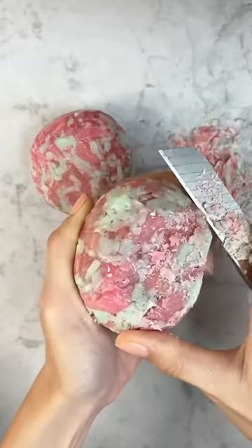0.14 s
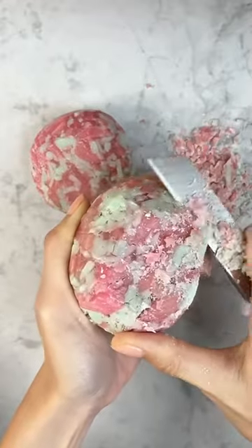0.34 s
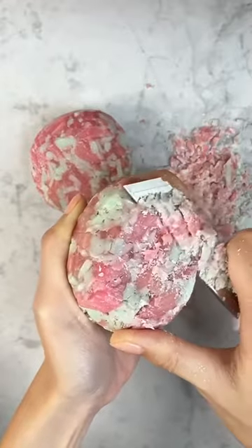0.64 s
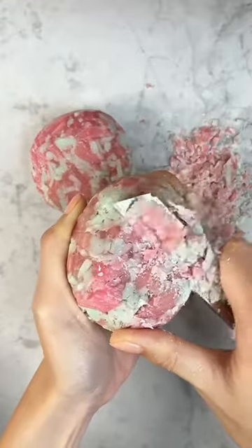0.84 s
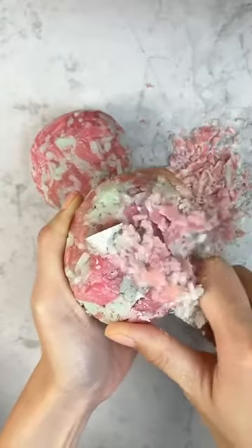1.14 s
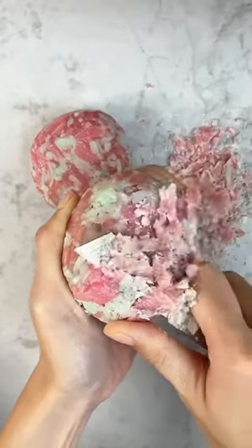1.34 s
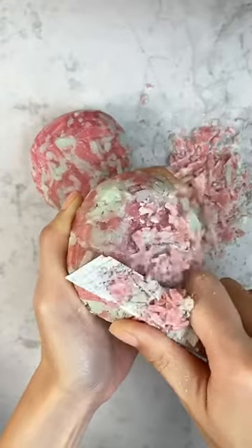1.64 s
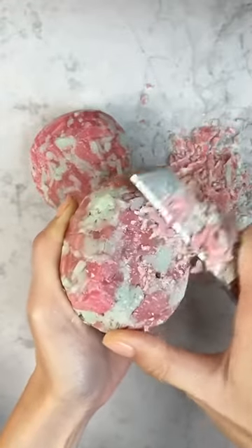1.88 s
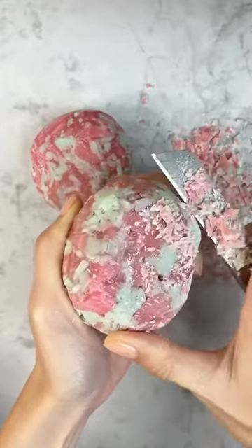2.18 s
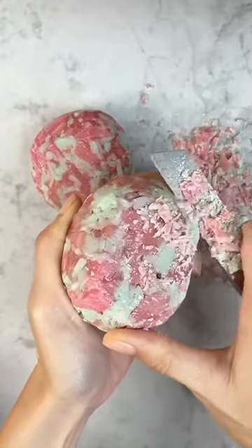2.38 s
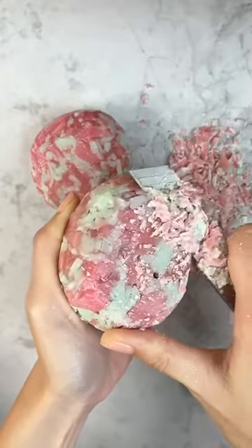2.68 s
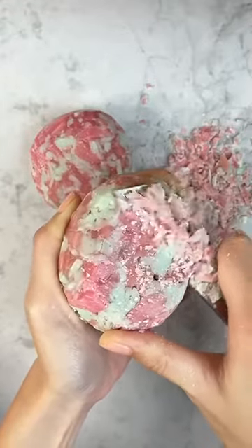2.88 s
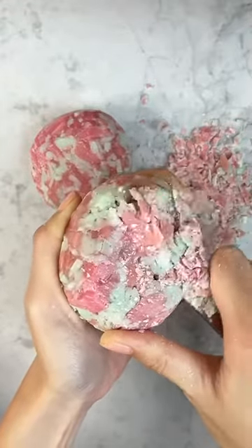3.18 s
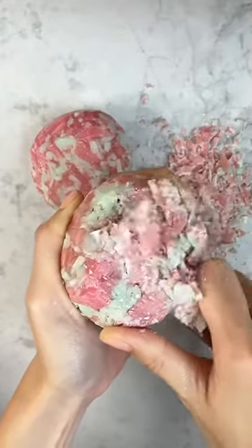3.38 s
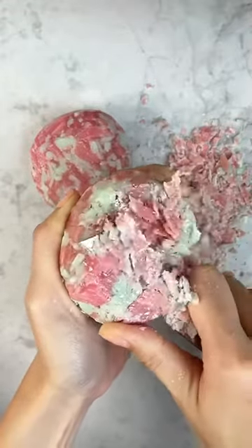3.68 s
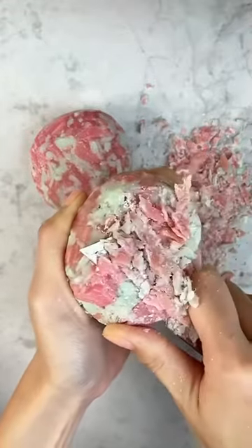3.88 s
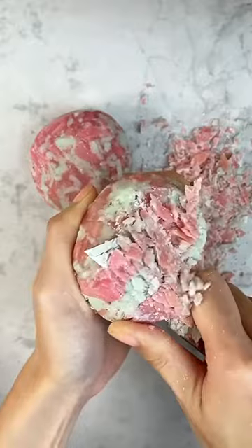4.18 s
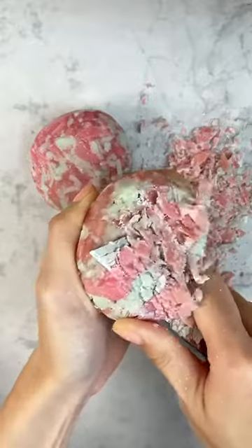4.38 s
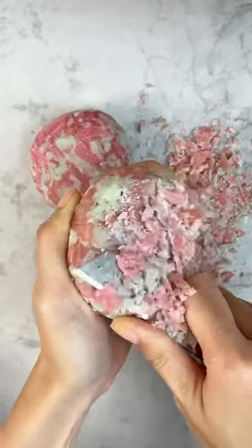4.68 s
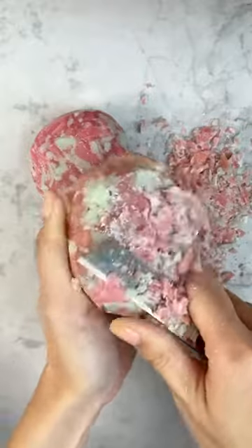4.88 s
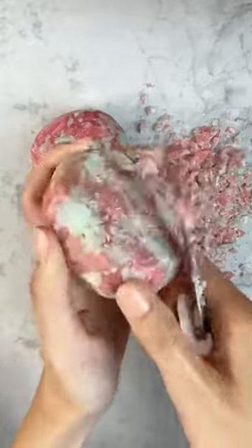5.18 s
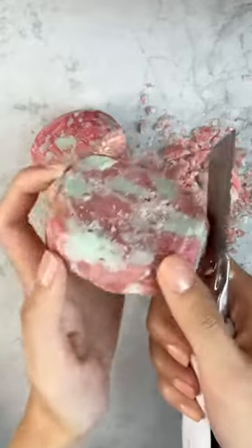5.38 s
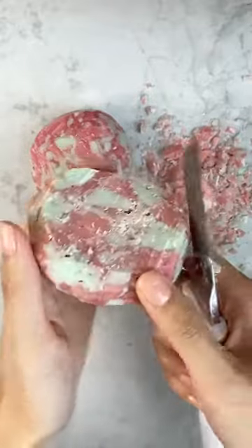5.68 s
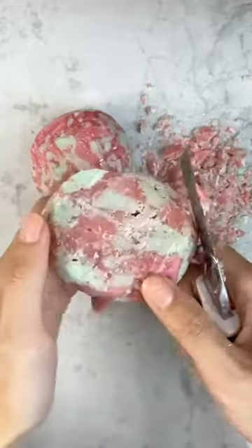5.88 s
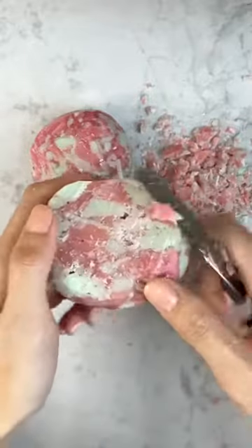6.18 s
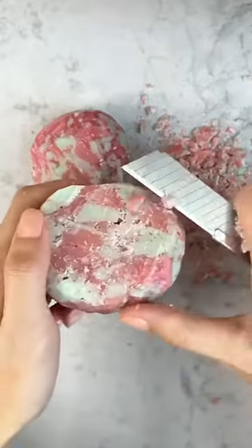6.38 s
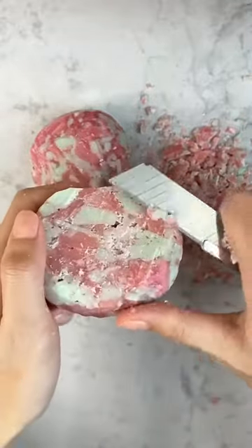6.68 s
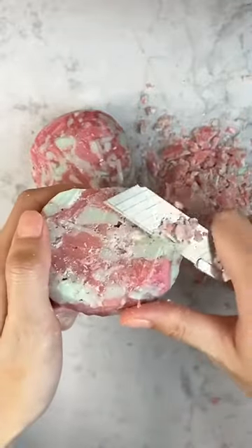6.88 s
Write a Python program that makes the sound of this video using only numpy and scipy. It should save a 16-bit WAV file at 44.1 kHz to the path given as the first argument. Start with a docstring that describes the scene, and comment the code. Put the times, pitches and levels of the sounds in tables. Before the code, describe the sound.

Close to the microphone, dry pressed soap crunches and fizzes under a knife blade in uneven scraping strokes, dotted with tiny cracks, metallic ticks and soft, low knocks. Fingers rustle faintly on the powdery surface in the pauses. After a longer lull the blade clinks and the crumbling starts again. A low rumble and faint hiss fill the small room.

```python
"""A snap-off blade pushed through a hand-held ball of dry pressed soap, close to the microphone.
The edge crumbles the soap in a stream of tiny fractures; flakes crack off, the blade pings, and when
it sticks and slips the ball knocks dully. The hands take the jolts with soft thumps and rustle on
the powder between strokes. The place is a small room with a low rumble and a faint hiss; the stone
top under the hands and the walls answer briefly."""
import sys
import numpy as np
from scipy import signal
from scipy.fft import rfft, irfft
from scipy.io import wavfile

SR = 44100
rng = np.random.default_rng(int(sys.argv[2]) if len(sys.argv) > 2 else 0)


def unload_audio(sound):
    """Save the sound as a 16-bit wav file, at the path given as the first command line argument."""
    columns = np.transpose(np.atleast_2d(sound))
    # keep every value between -1 and 1, then stretch to whole-number steps
    steps = np.round(np.clip(columns, -1, 1) * 32767)
    wavfile.write(sys.argv[1], SR, steps.astype(np.int16))


N = 310464
TIME = np.arange(N) / SR
LOW_HZ, CRUNCH_HZ, FIZZ_HZ, TOP_HZ, CUTOFF_HZ = 247, 1397, 6030, 14600, 16000   # band edges

# low resonances of the ball and the small room, ringing with each knock: pitch_hz, width_hz, gain_db
LOW_RESONANCES = [(111, 34, -11.5), (221.4, 37, -4.5), (237, 21, -3.5), (333.8, 38.4, 0.5), (432, 64, 0),
                  (536.5, 83, -4.5), (835, 32, -11), (1038, 55, -7), (1357, 150, -20), (1700, 410, -25)]


def from_db(db):
    """Decibels to gain."""
    return 10 ** (np.asarray(db) / 20)


def unit_power(x):
    """Scale to a mean square of 1."""
    return x / np.sqrt(np.mean(x ** 2) + 1e-20)


def as_blow(x):
    """Scale to the energy of 8 ms at unit power."""
    return x * np.sqrt(.008 * SR / np.sum(x ** 2))


def drift(rate_hz):
    """A smooth random wander of spread 1."""
    pole = np.exp(-20 * np.pi * rate_hz / SR)
    slow = signal.lfilter([1], [1, -2 * pole, pole * pole], rng.standard_normal(N // 10 + 4002))[4000:]
    return np.interp(np.arange(N) / 10, np.arange(len(slow)), unit_power(slow))


def butter(x, hz, kind, order=2):
    """Causal Butterworth filter."""
    sections = signal.butter(order, np.clip(hz, 10, .45 * SR), kind, fs=SR, output="sos")
    return signal.sosfilt(sections, x + 1e-18)


def resonance(x, hz, width_hz):
    """One damped mode, gain 1 at its peak."""
    r = np.exp(-np.pi * width_hz / SR)
    feedback = [1, -2 * r * np.cos(2 * np.pi * hz / SR), r * r]
    return signal.lfilter(np.array([1, 0, -1]) * (1 - r * r) / 2, feedback, x + 1e-18)


def coloured(x, peaks):
    """A chain of peaks and dips."""
    for hz, width_hz, lift_db in peaks:
        x = x + (from_db(lift_db) - 1) * resonance(x, hz, width_hz)
    return x


def shaped(x, spectrum):
    """Filter by a curve of (frequency_hz, gain_db) points; unit power."""
    hz, db = np.transpose(spectrum)
    curve_db = np.interp(np.log(np.fft.rfftfreq(N, 1 / SR) + 1e-9), np.log(hz), db)
    return unit_power(irfft(rfft(x) * from_db(curve_db), N))


def fractures(per_s, spread_db, size=N):
    """Clicks at random moments, their levels scattered by spread_db; unit power."""
    chance, energy = rng.uniform(-1, 1, size), rng.exponential(1, size)
    clicks, at = np.zeros(size), np.abs(chance) < per_s / SR
    clicks[at] = np.sign(chance[at]) * from_db(spread_db * np.minimum(energy[at], 4))
    return unit_power(clicks)


def gesture(start_s, length_s, attack_s, release_s):
    """The power of one movement: it builds up, holds and dies away."""
    age = TIME - start_s
    return (np.clip(age / attack_s, 0, 1) * np.exp(-np.clip((age - length_s) / release_s, 0, 20))) ** 2


def room_tone(rumble_db=-33, hiss_db=-60.5):
    """The steady background of the place: a low rumble and a faint hiss."""
    # spectra of the two noises: frequency_hz, relative_db
    rumble_spectrum = [(8, 1.5), (14, -7.5), (24, -6.5), (32, -21), (40, -16.5), (48, -13), (62, -23.5),
                       (85, -25), (120, -36.5), (200, -38), (300, -47.5), (600, -66.5)]
    hiss_spectrum = [(100, 10.5), (220, 2.5), (350, -3.5), (650, -8.5), (1000, -10), (2100, -14.5),
                     (5000, -22.5), (12000, -40), (16000, -45)]
    rumble = shaped(rng.standard_normal(N), rumble_spectrum)
    hiss = shaped(rng.standard_normal(N), hiss_spectrum)
    return from_db(rumble_db) * rumble + from_db(hiss_db) * hiss


def reflections(x, stone_s=.0122, stone_db=-10, nearby_db=-22, spread_s=.03, dull_hz=2600):
    """One clear echo from the stone top and eight weaker ones from things nearby, all dulled."""
    out = from_db(stone_db) * np.interp(TIME - stone_s, TIME, x, left=0)
    for lag_s in rng.uniform(.1, 1, 8) * spread_s:
        lag = int(lag_s * SR)
        out[lag:] += rng.choice([-1, 1]) * from_db(nearby_db) * x[:-lag]
    return butter(out, dull_hz, "low", order=1)


def room(x, scatter_db=-17.5, scatter_t60_s=.077, walls_db=-28, walls_t60_s=.52, dull_hz=10000):
    """After the first reflections each band lingers as diffuse scatter and a faint tail from the walls."""
    out = x + reflections(x)
    age, linger = np.arange(16000) / SR, 0
    onset = np.clip(age / .003 - .5, 0, 1)
    for db, t60_s in [(scatter_db, scatter_t60_s), (walls_db, walls_t60_s)]:
        decay = (from_db(-60 * age / t60_s) * onset) ** 2
        linger += from_db(db) ** 2 * decay / decay.sum()
    edges = np.geomspace(180, CUTOFF_HZ, 8)
    for band in zip(edges, edges[1:]):
        energy = np.abs(signal.oaconvolve(butter(x, band, "band") ** 2, linger)[:N])
        noise = unit_power(butter(rng.standard_normal(N), band, "band"))
        out += np.sqrt(energy / (1 + (band[0] / dull_hz) ** 2)) * noise
    return out


def low_ring(force, stretch=1, touch_db=np.zeros(len(LOW_RESONANCES))):
    """Low resonances of the ball and the small room; stretch scales pitches, touch_db weights them."""
    return sum((-1) ** k * from_db(db + touch_db[k]) * resonance(force, hz * stretch, width_hz)
               for k, (hz, width_hz, db) in enumerate(LOW_RESONANCES))


def hand_thumps(pitch_hz=165, width_hz=90, soft_hz=210, settle_s=.011, size=4000):
    """Flesh gives under the ball: a short, heavily damped low thud."""
    # the hands take a jolt of the blade: start_s, level_db
    jolts = [(0.306, -48.5), (0.369, -47), (1.09, -44), (2.404, -46), (2.453, -43.5), (3.329, -45.5),
             (3.733, -37.5), (4.51, -45), (4.927, -36.5), (5.058, -46.5), (6.635, -40.5), (6.76, -49),
             (6.889, -41.5)]
    out, age = np.zeros(N + size), np.arange(size) / SR
    for start_s, db in jolts:
        force = butter(rng.standard_normal(size) * np.exp(-age / settle_s), soft_hz, "low")
        out[int(start_s * SR):][:size] += from_db(db) * as_blow(resonance(force, pitch_hz, width_hz))
    return out[:N]


def finger_rubs(uneven_db=6):
    """Fingertips drag powder over the ball: a fine, uneven rustle and a low murmur."""
    # the fingers shift between strokes: start_s, length_s, rustle_db, murmur_db
    shifts = [(0.0, 0.066, -62, -58.5), (0.151, 0.2, -61.5, -85), (4.004, 0.024, -61.5, -69),
              (4.272, 0.26, -67.5, -68), (5.395, 0.337, -63.5, -71), (5.674, 0.056, -62.5, -70),
              (5.814, 0.28, -68, -69), (6.018, 0.094, -69, -72), (6.182, 0.13, -64, -65),
              (6.55, 0.052, -63, -55)]
    # powder under the fingertips: frequency_hz, relative_db
    powder_spectrum = [(300, -1), (1200, 0), (2200, 5.5), (4000, 1), (8000, 0), (11000, 4.5), (14000, -2.5),
                       (16000, -5.5)]
    grit = fractures(per_s=3000, spread_db=.5) * from_db(uneven_db * drift(rate_hz=25))
    rustle, murmur = shaped(grit, powder_spectrum), unit_power(low_ring(grit))
    out = np.zeros(N)
    for start_s, length_s, rustle_db, murmur_db in shifts:
        envelope = np.sqrt(gesture(start_s, length_s, attack_s=.014, release_s=.038))
        out += envelope * (from_db(rustle_db) * rustle + from_db(murmur_db) * murmur)
    return out


def blade_pings(width_hz=290, spread_hz=1200, contact_s=.0035, grit_db=-20, size=1500):
    """A brief gritty contact rings one bending mode of the blade; the soap damps it quickly."""
    # the blade is tapped or springs free, pitched by where it is held: start_s, pitch_hz, level_db
    taps = [(0.226, 1960, -51), (0.3759, 1950, -57), (0.4643, 2040, -47), (0.935, 2450, -40.5),
            (1.5142, 1780, -42), (1.9246, 3260, -37.5), (1.9428, 4400, -38), (1.9587, 1840, -37.5),
            (2.352, 1980, -39.5), (2.404, 1970, -46), (2.4562, 2030, -49.5), (2.7416, 2500, -44.5),
            (3.686, 1100, -41.5), (4.6038, 3270, -38), (5.0648, 4520, -36), (6.117, 2000, -57),
            (6.16, 760, -29), (6.162, 2050, -31), (6.1619, 2920, -35.5), (6.4982, 1970, -51.5),
            (6.7258, 4280, -25.5), (6.727, 2980, -28.5)]
    out, age = np.zeros(N + size), np.arange(size) / SR
    for start_s, hz, db in taps:
        force = from_db(grit_db) * rng.standard_normal(size) * np.exp(-age / contact_s)
        force[0] += 1
        ping = resonance(resonance(force, hz, spread_hz), hz, width_hz)
        out[int(start_s * SR):][:size] += from_db(db) * as_blow(ping)
    return out[:N]


def blade_slips(soft_hz=1300, hardening=.74, typical_db=-35, settle_db=-29, settle_s=.0036, size=3000):
    """Each slip is one soft blow on the ball, followed by a short shudder as the edge bites again."""
    # the blade jumps forward or knocks into the ball: start_s, level_db
    jumps = [(0.628, -38.5), (0.6974, -32), (0.7732, -31), (0.8485, -36.5), (0.8781, -34), (1.047, -35),
             (1.0723, -38.5), (1.1015, -30.5), (1.1596, -36), (1.2789, -35.5), (1.3402, -32),
             (1.4619, -27.5), (1.5201, -39.5), (1.678, -41.5), (1.9032, -37.5), (1.9732, -35.5),
             (2.0173, -36), (2.618, -46), (3.0066, -39), (3.112, -38.5), (3.1724, -38), (3.1844, -28),
             (3.5216, -30), (3.7403, -41), (4.474, -41), (4.5127, -38), (4.5675, -39.5), (4.5927, -35.5),
             (4.7996, -38), (4.9176, -39.5), (4.9747, -37.5), (5.932, -48), (5.968, -47.5), (6.16, -44),
             (6.6338, -42.5), (6.738, -41)]
    out, age = np.zeros(N + size), np.arange(size) / SR
    for start_s, db in jumps:
        force = from_db(settle_db) * fractures(1000, 2.5, size) * np.exp(-age / settle_s)
        force[0] += 1
        contact_hz = soft_hz * from_db(hardening * (db - typical_db))   # harder blows are brighter
        stretch = 1 + .024 * rng.standard_normal()
        touch_db = 3.5 * rng.standard_normal(len(LOW_RESONANCES))
        knock = low_ring(butter(force, contact_hz, "low"), stretch, touch_db)
        out[int(start_s * SR):][:size] += from_db(db) * as_blow(knock)
    return out[:N]


def flake_cracks(rise=.66, ring_db=3.5, ring_width_hz=350, trim_db=-3, size=2600):
    """A crack runs through a flake in milliseconds: a burst of fractures ringing at its pitches."""
    # flakes break and the blade strikes the soap: start_s, length_s, relative_db, tilt_db (per band)
    breaks = [(0.262, .004, -57, 10), (0.3764, 0.0054, -44, 1.5), (0.4617, 0.0097, -41.5, 1.5),
              (0.5644, 0.0031, -48.5, 6), (0.629, 0.0015, -57.5, 17.5), (0.906, 0.0039, -46.5, 11),
              (0.92, 0.0016, -51, 6), (0.9316, 0.0081, -44.5, 1.5), (0.9885, 0.0028, -46, 3),
              (1.218, 0.0042, -45, 0), (1.258, .002, -49, 9), (1.31, 0.0015, -43.5, -5),
              (1.5133, 0.0026, -39.5, 5), (1.5465, 0.0027, -46.5, 4), (1.6792, 0.0029, -51, -12.5),
              (1.874, 0.0028, -45.5, 1), (1.924, 0.0017, -39, -9.5), (1.9447, 0.0027, -26.5, 5.5),
              (2.403, 0.0049, -46.5, 0), (2.4566, .005, -46, 1), (2.743, 0.0047, -44, 2),
              (2.9314, 0.0029, -45.5, -2.5), (2.964, 0.0042, -39.5, 3), (3.0706, 0.0036, -39.5, -6),
              (3.082, 0.0032, -38, 0.5), (3.1595, .003, -49.5, -6), (3.2854, 0.0023, -41.5, 15.5),
              (3.336, 0.0028, -45, 6.5), (3.391, .003, -47.5, -1), (3.687, 0.0034, -51.5, -5),
              (3.726, .0026, -43.5, -4.5), (3.7578, 0.0027, -51, -0.5), (4.179, .0026, -67.5, -10),
              (4.318, 0.0053, -69, 9), (4.6024, 0.0026, -36, 1), (4.7604, 0.0016, -46.5, 0.5),
              (4.8074, 0.0027, -56.5, -22.5), (5.035, 0.0023, -40.5, 2.5), (5.0672, 0.0021, -34.5, 2.5),
              (5.125, 0.0024, -32, -1.5), (5.373, 0.0032, -52.5, -9), (5.6784, .002, -55, 0),
              (6.161, 0.0033, -35, 5.5), (6.2455, 0.0032, -56, -3.5), (6.4967, 0.0018, -61, -12.5),
              (6.6354, 0.0012, -46.5, -4.5), (6.7255, 0.0022, -29, 1.5), (6.958, 0.0043, -52.5, 11)]
    # the blade as a flake lets it go: pitch_hz, width_hz, lift_db
    free_blade = [(1400, 67, -2.5), (3160, 380, 6.5), (3800, 720, -2.5), (4380, 200, 4.5),
                  (5370, 3100, -0.5), (10100, 6000, 4.5)]
    out, lead = np.zeros(N + size), size // 4
    age = (np.arange(size) - lead) / SR
    edges = [LOW_HZ, CRUNCH_HZ, FIZZ_HZ, TOP_HZ]
    for start_s, length_s, db, tilt_db in breaks:
        past_crest = age / length_s - .5
        envelope = np.exp(np.minimum(past_crest / rise, -past_crest))
        burst = envelope * fractures(per_s=14000, spread_db=3, size=size)
        flake = [(hz, ring_width_hz, ring_db) for hz in rng.uniform(CRUNCH_HZ, TOP_HZ, size=4)]
        burst = coloured(burst, free_blade + flake)
        for k, band_db in enumerate([db - tilt_db, db, db + tilt_db]):
            part = as_blow(butter(burst, edges[k:k + 2], "band"))
            out[int(start_s * SR) - lead:][:size] += (-1) ** k * from_db(band_db + trim_db) * part
    return out[:N]


def crumbs(per_s=110, width_hz=700, ring_db=13, count=14):
    """Single grains pop off now and then, each with a pitch set by its size; unit power."""
    pitches = np.linspace(CRUNCH_HZ, TOP_HZ, count) * rng.uniform(.9, 1.1, count)
    return unit_power(sum(coloured(fractures(per_s / count, spread_db=2), [(hz, width_hz, ring_db)])
                          for hz in pitches))


def chips(decay_s=.0036):
    """Small flakes chip off at random, each a brief burst; unit power."""
    onsets = np.abs(fractures(per_s=14, spread_db=-1.5))
    envelope = signal.lfilter([1], [1, -np.exp(-1 / (decay_s * SR))], onsets + 1e-18)
    return unit_power(envelope * rng.standard_normal(N))


def flake_ring(x, width_hz=330, ring_db=-7, wander_db=7, count=13):
    """Curling flakes each ring at a pitch of their own, and come and go."""
    pitches = np.linspace(CRUNCH_HZ, TOP_HZ, count) * rng.uniform(.94, 1.06, count)
    return x + sum(resonance(x, hz, width_hz) * from_db(ring_db + wander_db * np.clip(drift(19), -2, 2))
                   for hz in pitches)


def ball_shudder(force, bump_db=1, broad_db=-9):
    """The ball trembles with the fractures and bumps each time the edge gives a little; unit power."""
    force = force + from_db(bump_db) * fractures(per_s=90, spread_db=2)
    broad = unit_power(butter(force, [LOW_HZ, CRUNCH_HZ], "band"))
    return unit_power(unit_power(low_ring(force)) + from_db(broad_db) * broad)


def effort(moves, attack_s, release_s):
    """Overlapping movements add in power: how hard the ball shakes, the soap crunches and fizzes."""
    power = np.zeros((3, N))
    for start_s, length_s, db, ball_db, fineness_db in moves:
        gains = from_db([ball_db, db - fineness_db, db + fineness_db])
        power += np.outer(gains ** 2, gesture(start_s, length_s, attack_s, release_s))
    return power


def crumbling(powder_db=-10, crumb_db=-2, chip_db=-3, judder_db=4, coarse_db=2, trim_db=-1):
    """Tiny fractures clump as the edge judders; they shake the ball and set the flakes ringing."""
    # the blade travels at a steady pressure: start_s, length_s, crumbling_db, ball_db, fineness_db
    strokes = [(0.419, 1.104, -58, -56.5, 3), (1.663, 0.45, -59.5, -53.5, 1),
               (2.408, 1.01, -61, -64.5, 1.5), (3.40, 0.44, -70.5, -56, 5.5), (4.485, 0.19, -59, -51.5, 2),
               (4.755, 0.59, -61.5, -54, 1), (6.635, 0.1, -60, -64, -2), (6.85, 0.21, -60.5, -59.5, 3)]
    # the edge bites deeper and a patch of soap gives way: same columns
    bites = [(0.302, 0.067, -51.5, -61, -3.5), (0.492, 0.023, -46, -71, 3.5), (0.68, 0.03, -43.5, -47, 1.5),
             (0.769, 0.012, -48, -52, 2), (0.83, 0.058, -52.5, -50.5, 4), (0.913, 0.037, -44, -49, 3),
             (1.078, 0.026, -40, -50, 1), (1.122, 0.079, -53.5, -53, 2), (1.446, 0.076, -56.5, -49, 9.5),
             (1.717, 0.07, -47, -43.5, -2), (1.951, 0.066, -47, -48, -2), (2.124, 0.032, -51.5, -63, 0),
             (2.495, 0.025, -57, -78, -4.5), (2.54, 0.033, -53.5, -57, -6.5),
             (2.68, 0.0099, -49, -50, -4.5), (2.765, 0.095, -52, -54, 4), (2.87, 0.023, -60.5, -44.5, -5),
             (2.928, 0.11, -58.5, -50.5, 1), (3.09, 0.02, -59.5, -64, 4), (3.175, 0.092, -61, -46.5, 5),
             (3.288, 0.076, -47, -48.5, 2), (3.515, 0.021, -57, -60, -1), (3.566, 0.034, -54, -60, 3),
             (3.716, 0.02, -58, -51, 0), (4.612, 0.032, -49, -46.5, 2), (4.755, 0.022, -59, -40, 14),
             (4.91, 0.13, -57, -45.5, 0), (5.118, 0.055, -53, -43.5, -2), (5.202, 0.057, -50, -52, -4),
             (5.30, 0.052, -49.5, -67, 0), (6.729, 0.03, -49, -52, 1), (6.862, 0.043, -43.5, -43, -1.5)]
    # tone colour (ringing peaks, a sheen near 6 kHz, a dip above it): pitch_hz, width_hz, lift_db
    tone_colour = [(705, 110, 17.5), (1500, 370, -2.5), (1920, 200, 6), (2560, 48, 3.5), (3100, 120, 4.5),
                   (3840, 600, -5.5), (4850, 58, -6), (5240, 160, -17), (6270, 430, 5), (6650, 810, -39),
                   (8100, 230, -5)]
    power = effort(strokes, attack_s=.0094, release_s=.055) + effort(bites, attack_s=.011, release_s=.011)
    shake_gain, crunch_gain, fizz_gain = np.sqrt(power)
    powder = fractures(per_s=4500, spread_db=1) + from_db(powder_db) * rng.standard_normal(N)
    debris = powder + from_db(crumb_db) * crumbs() + from_db(chip_db) * chips()
    force = unit_power(debris * from_db(judder_db * drift(rate_hz=40)))
    ringing = coloured(flake_ring(force), tone_colour)
    coarseness = from_db(coarse_db * drift(rate_hz=30))   # coarse patches crunch, fine ones fizz
    shake = shake_gain * ball_shudder(force)
    crunch = crunch_gain * coarseness * unit_power(butter(ringing, [CRUNCH_HZ, FIZZ_HZ], "band"))
    fizz = fizz_gain / coarseness * unit_power(butter(ringing, [FIZZ_HZ, TOP_HZ], "band"))
    return from_db(trim_db) * (shake - crunch) + fizz


def scene():
    """The cutting at one close microphone in a small room, over the room tone."""
    background = room_tone()
    cutting = crumbling() + flake_cracks() + blade_slips() + blade_pings() + finger_rubs()
    return (room(cutting) + hand_thumps() + background)[None]


def record(dry):
    """The treble is cut steeply above CUTOFF_HZ."""
    return signal.sosfilt(signal.ellip(12, .2, 80, CUTOFF_HZ, fs=SR, output="sos"), dry)


dry = scene()
out = record(dry)
unload_audio(out)
```